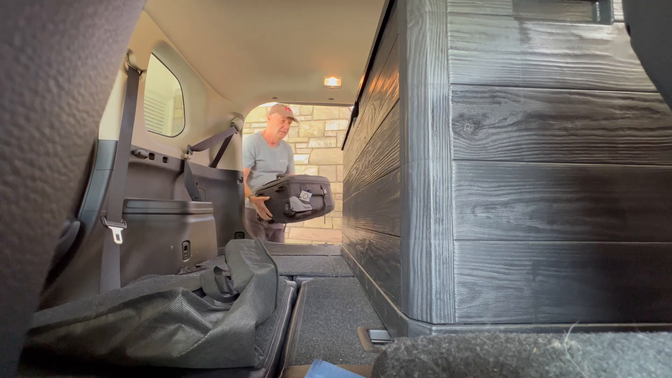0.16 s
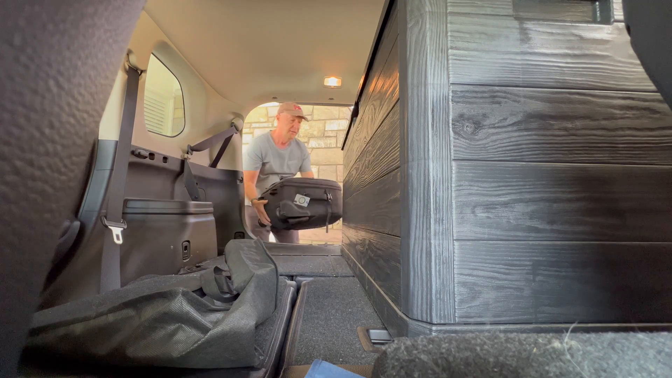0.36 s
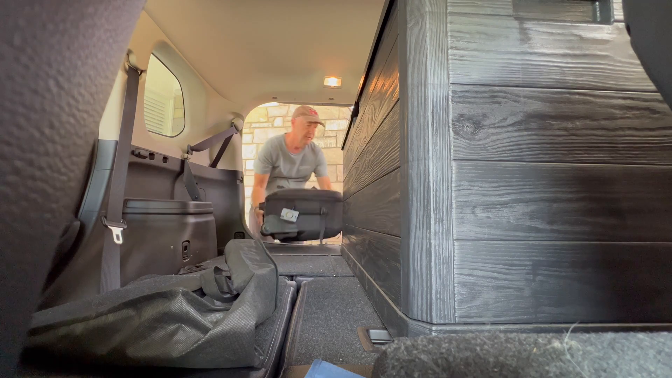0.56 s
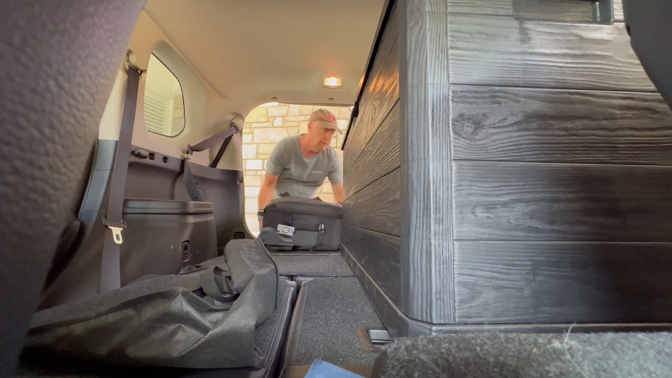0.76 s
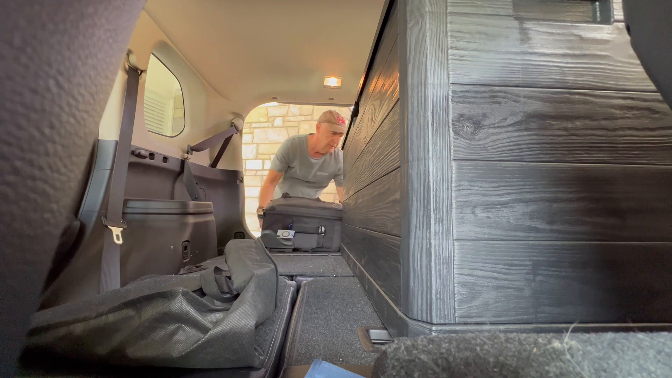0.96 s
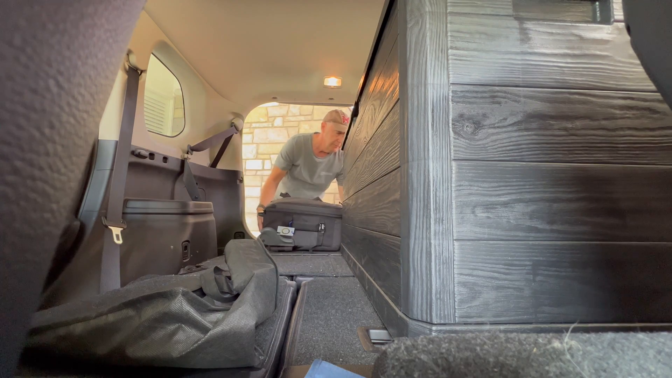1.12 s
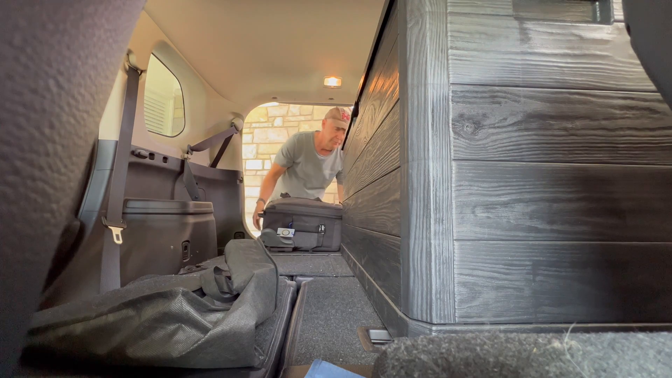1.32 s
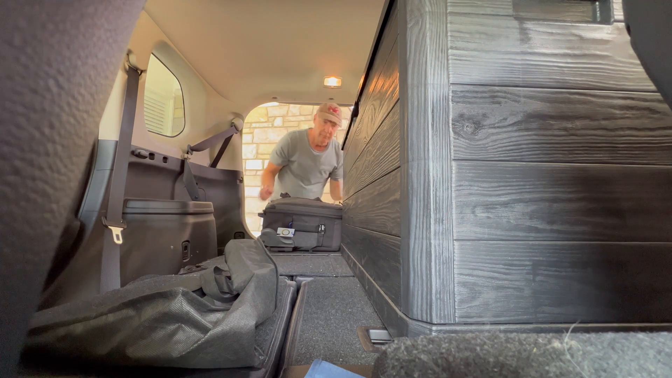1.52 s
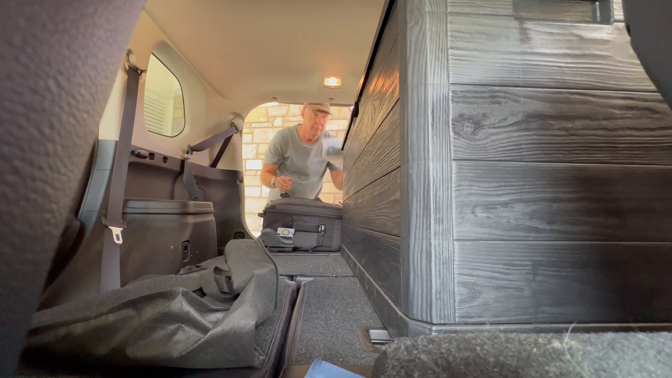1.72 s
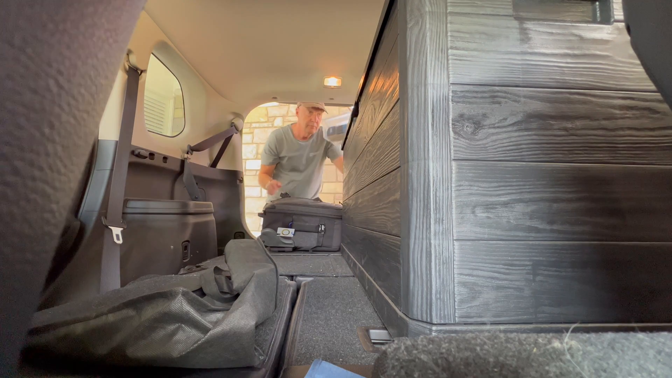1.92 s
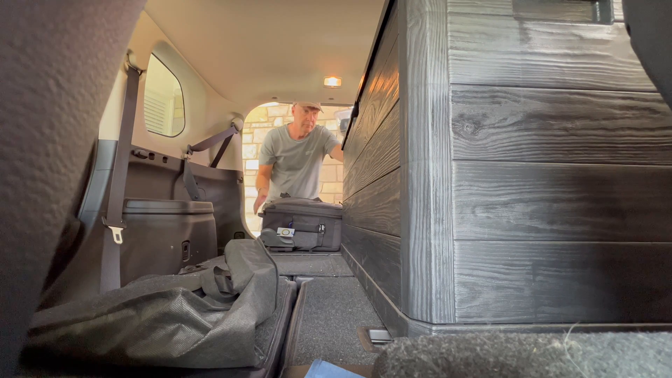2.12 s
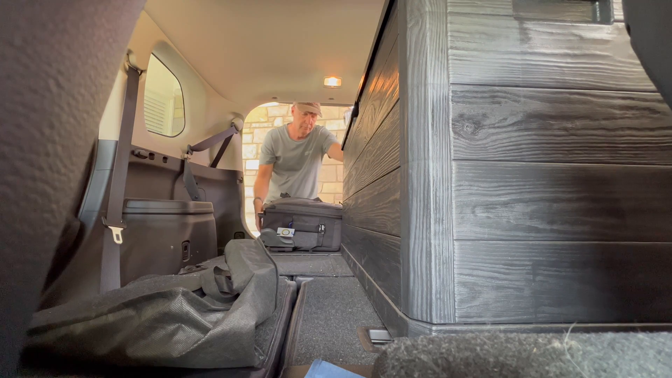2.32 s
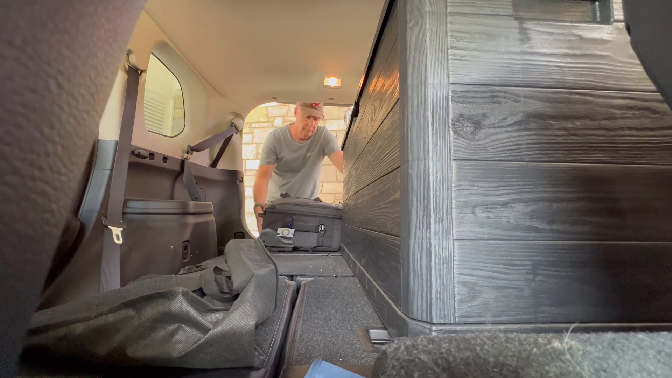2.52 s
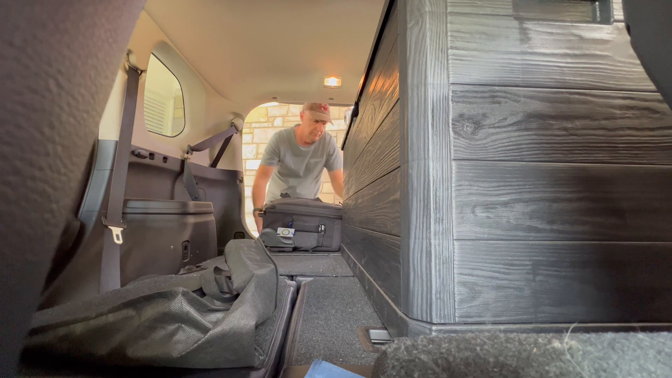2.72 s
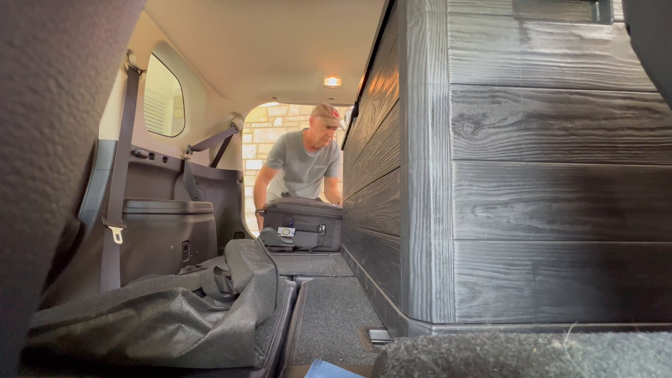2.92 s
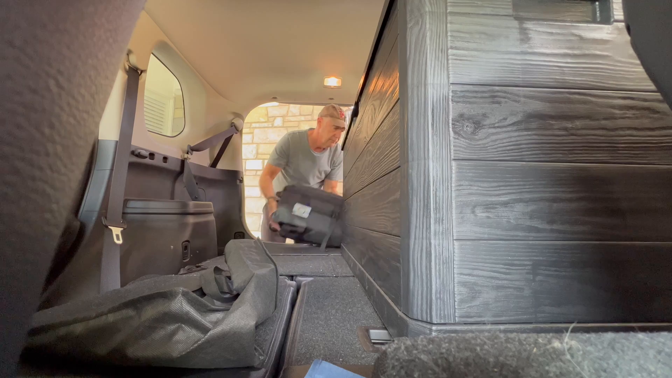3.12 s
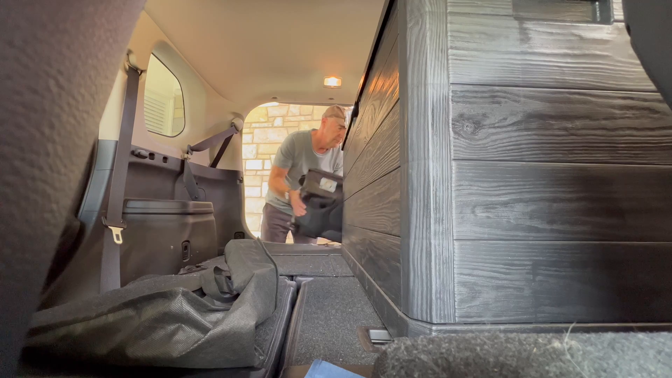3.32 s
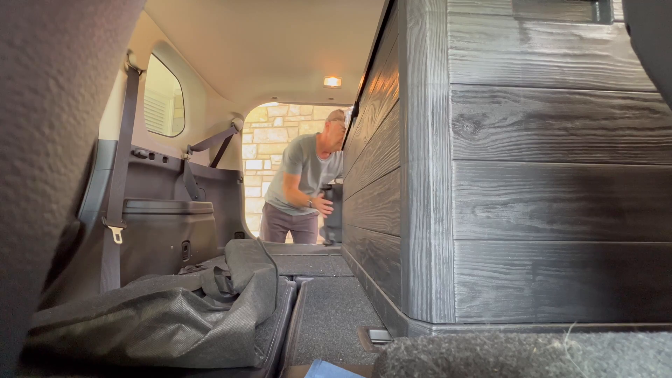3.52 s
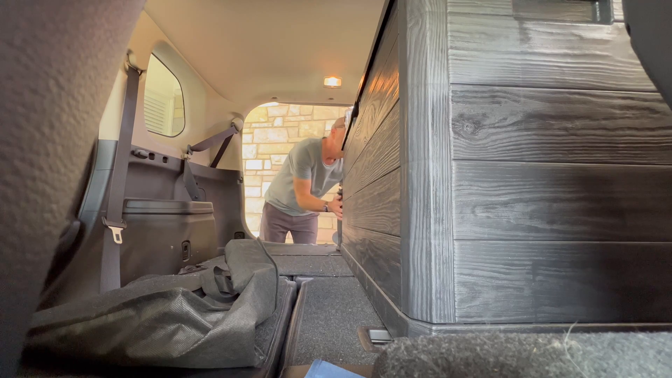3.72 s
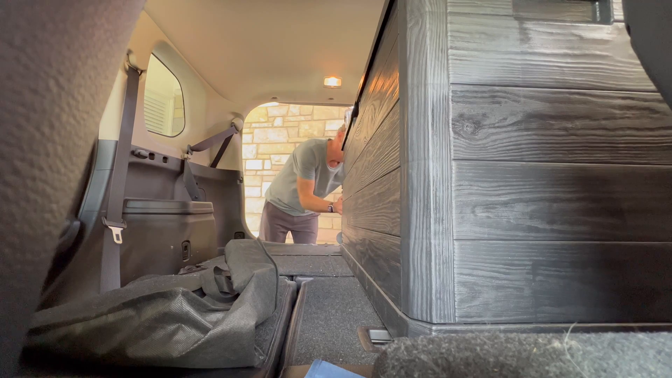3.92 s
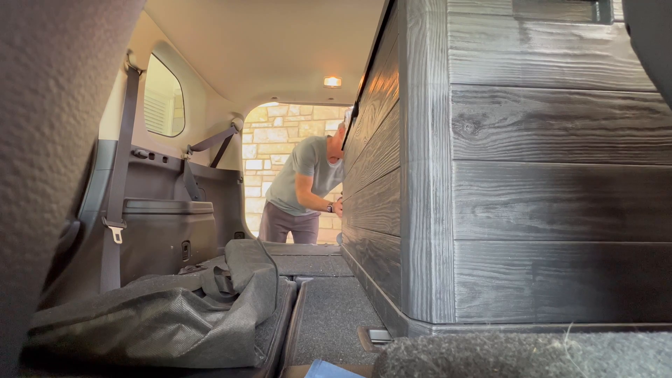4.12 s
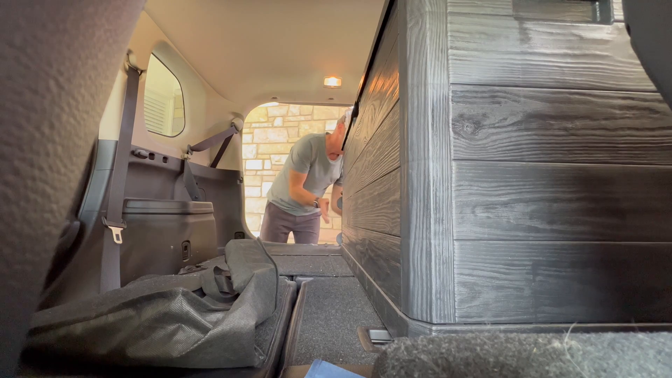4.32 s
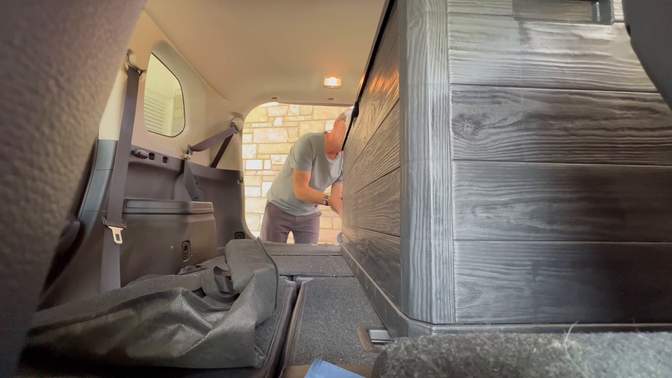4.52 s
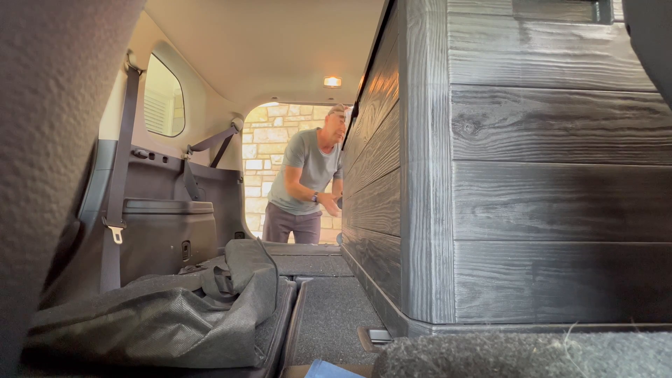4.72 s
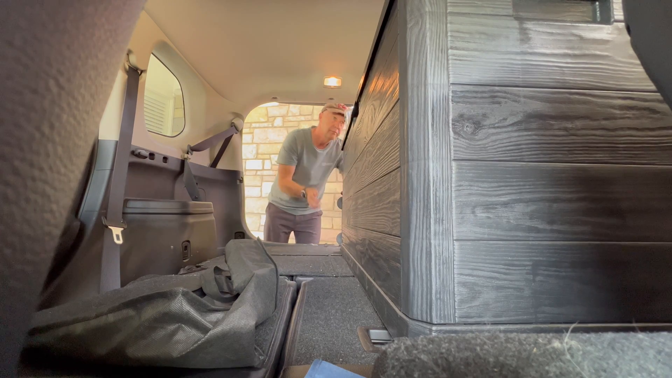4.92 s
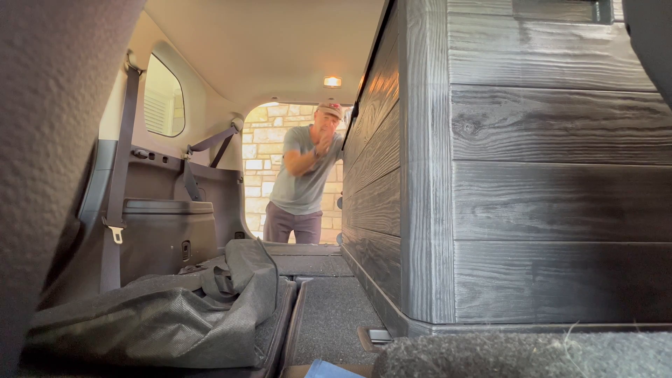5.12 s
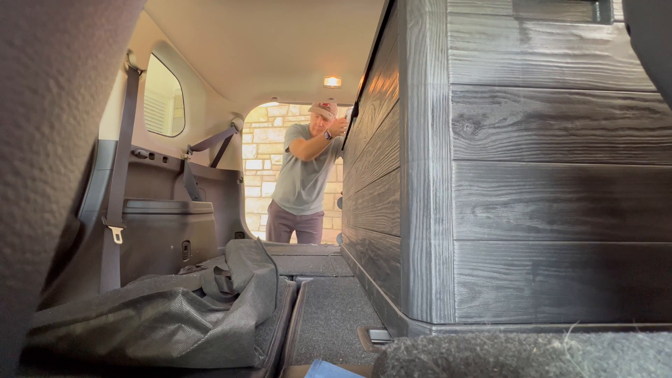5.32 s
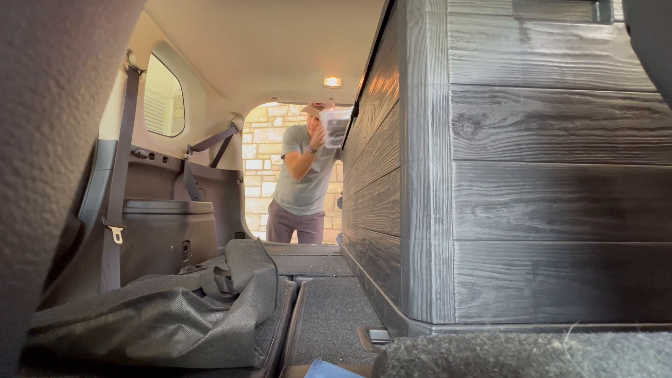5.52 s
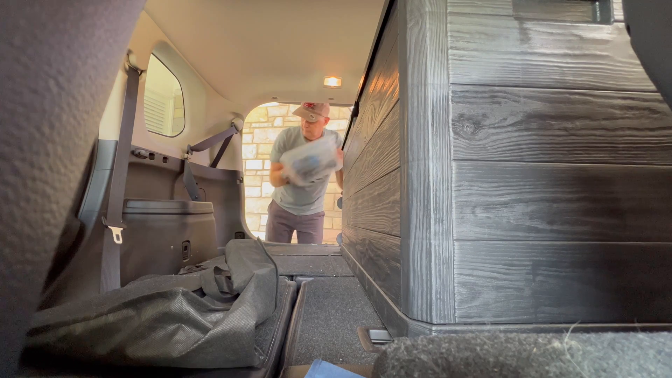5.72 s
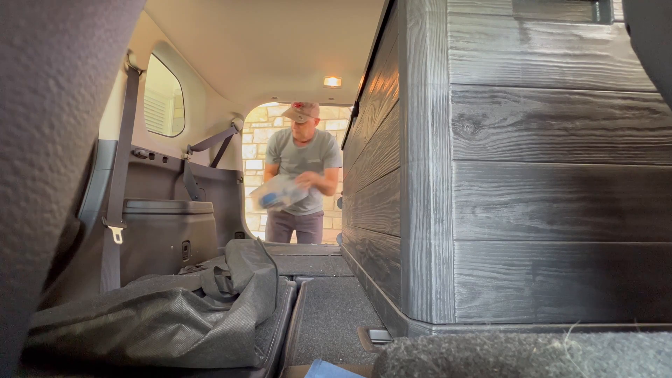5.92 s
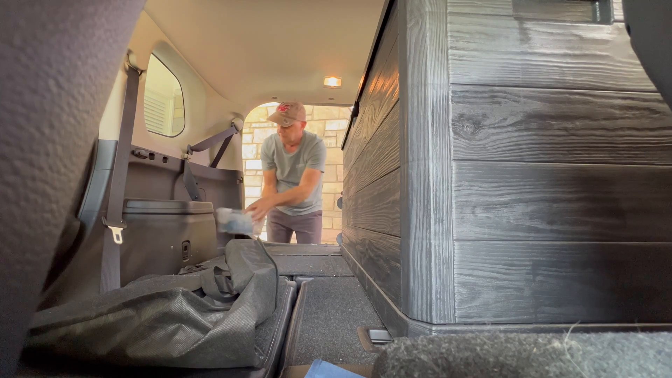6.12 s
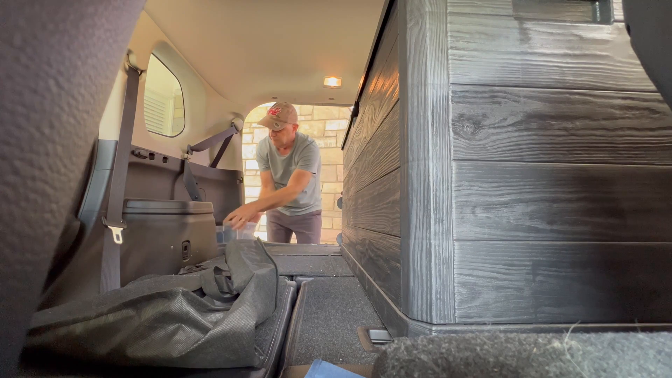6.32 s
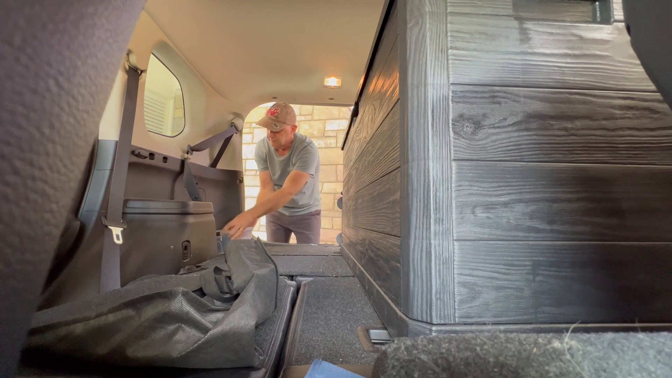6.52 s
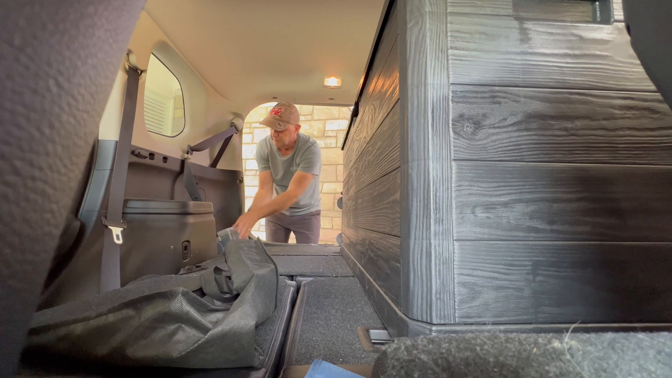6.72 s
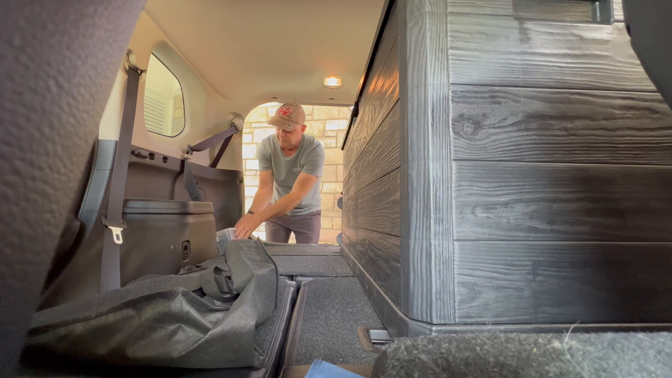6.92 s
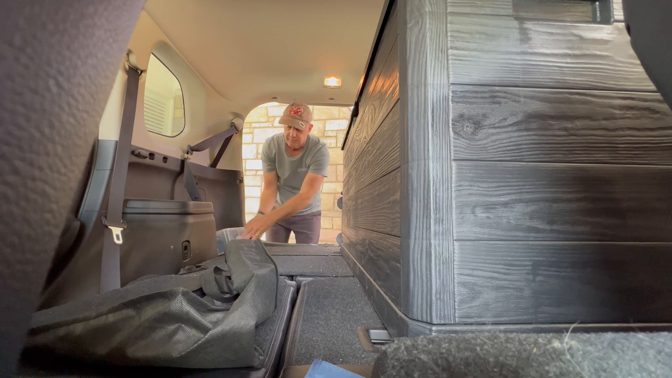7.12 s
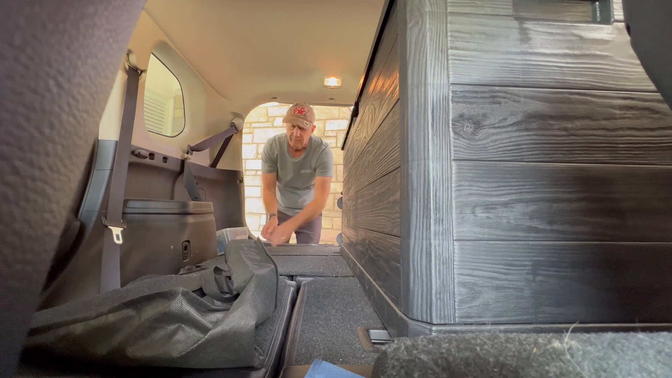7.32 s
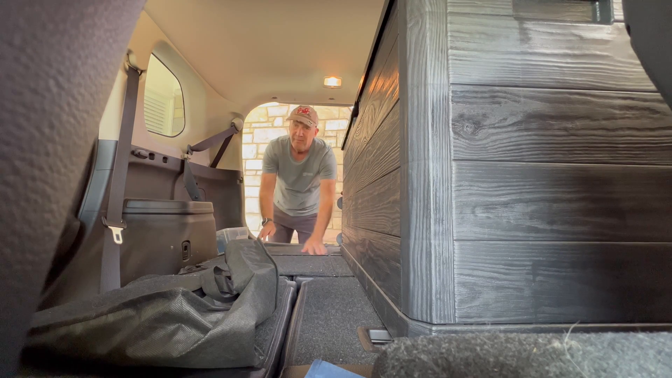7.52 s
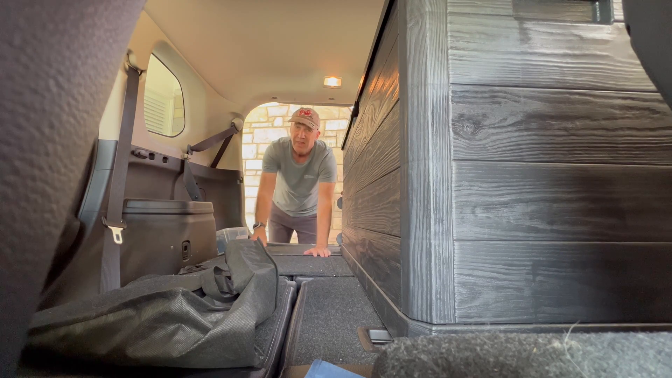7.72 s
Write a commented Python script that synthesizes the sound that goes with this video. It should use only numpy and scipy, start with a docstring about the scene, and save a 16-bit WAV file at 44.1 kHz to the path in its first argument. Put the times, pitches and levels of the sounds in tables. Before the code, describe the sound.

Gear is loaded at the tailgate of a car, with the microphone inside the cabin. Low floor thuds with dull plastic-shell knocks come in uneven groups, separated by short carpet scrapes, cloth swishes and an occasional small metal clink. The strongest activity is in the later part, with rapid rattling knocks and weighty booms, before it settles into quiet shuffling. The echo is short and muffled.

```python
"""In the carpeted cargo area of a car, heard from inside, cases and gear are set down and pushed about.
A hard edge knocks first: shaped noise and a few decaying shell modes. Then the weight thuds into the
load floor, a damped oscillation that sets the floor and cabin modes booming.
Between the blows fabric and shells slide and rustle as modulated noise bands, and small metal fittings
clink as clusters of short high partials. A padded echo and a faint steady hush surround it all."""
import sys
import numpy as np
from scipy import signal
from scipy.fft import rfft, irfft, next_fast_len
from scipy.io import wavfile
from scipy.ndimage import map_coordinates

SR = 44100
rng = np.random.default_rng(int(sys.argv[2]) if len(sys.argv) > 2 else 0)


def transcribe(u):
    """Save the signal u as a 16-bit wav file named by the first command-line argument.

    u: samples, shape (n,) or (channels, n), limited to [-1, 1]; the rate is SR.
    q: integer samples, one column per channel.
    """
    v = np.clip(np.atleast_2d(u).T, -1, 1)
    q = np.round(v * 32767).astype(np.int16)
    wavfile.write(sys.argv[1], SR, q)


N = 342083

# modes of a case's shell, before padding damps them: (frequency [Hz], level [dB], t60 [s])
SHELL_MODES = [(470, -5.5, 0.17), (539.5, 2, 0.12), (660, 1, 0.064), (754, 1.5, 0.096), (919, 4, 0.096),
               (992, -9, 0.086), (1327, -5, 0.22), (1574, -8, 0.11), (1770, -9.5, 0.053),
               (1965, -11.5, 0.19), (2400, -17, 0.068), (2455, -3, 0.04), (2800, -6, .1)]
# gear set down, edge first and weight after: (time [s], knock level [dB], brightness [dB],
# swell time [s], favoured shell pitch [Hz], thud level [dB], thud pitch [Hz], boom re thud [dB])
LANDINGS = [(.687, -17, -20.5, 0.003, 1500, -4, 99.4, -12), (1.002, -43.5, -22, .0015, 680, -30, 306, -3.5),
            (1.054, -31, -13, .0088, 750, -21, 150, -12), (1.072, -36.5, -22, .0035, 754, -17, 127.5, -10),
            (1.27, -40.5, -32, .0025, 750, -16, 95.7, -15.5),
            (1.439, -40.5, 6, 0.0021, 1510, -35.5, 383, -16.5),
            (1.62, -34, -23, 0.0033, 515, -40.5, 188, -21),
            (2.276, -26.5, -3.5, .0014, 1600, -11.5, 156, -23),
            (2.3126, -19, -6.5, 0.00054, 1370, -10, 97, -8.5),
            (2.322, -30.5, -20.5, 0.0022, 1360, -12, 214.6, -18),
            (3.181, -52, 9, 0.0062, 500, -23.5, 184.6, -18.5),
            (3.605, -20, -14.5, .0045, 650, -6.5, 94.6, -9), (3.749, -30, -23, 0.0018, 696, -15, 150, -17),
            (4.447, -31, -4, .011, 553, -19.5, 232.6, -7), (5.235, -24, -16, 0.0071, 1050, -8, 180.7, -25),
            (5.39, -34.5, -13.5, 0.0061, 1820, -24, 145, -13.5),
            (5.595, -31.5, -17.5, 0.0031, 1580, -29.5, 182, -14.5),
            (5.658, -21, -3.5, 0.0017, 2080, -6.5, 114, -10),
            (5.677, -19, -19.5, .0024, 2620, -9.5, 196.6, -12),
            (5.823, -31.5, -21, 0.0027, 1940, -24.5, 178, -11),
            (6.357, -22, -24, 0.00097, 685, -13.5, 136, -13),
            (6.533, -24, -16.5, 0.0035, 730, -15, 161, -13.5),
            (6.737, -32, -10, .0035, 1550, -26.5, 116, -13),
            (6.944, -14.5, -20.5, 0.0051, 636, -12, 138, -11)]


def amp(db):
    """Level to amplitude: 20 dB for each factor of ten."""
    return 10 ** (np.asarray(db) / 20)


def unit(x):
    """Normalisation to a root-mean-square of 1."""
    return x / np.sqrt(np.mean(x ** 2) + 1e-20)


def along(points, hz):
    """Linear interpolation of (frequency [Hz], value) points on a logarithmic frequency axis."""
    f, v = np.transpose(points)
    return np.interp(np.log(hz + 1), np.log(f + 1), v)


def fade(t, t60):
    """Exponential decay, losing 60 dB in t60 seconds."""
    return np.exp(-np.log(1000) * t / max(t60, 1e-3))


def rise(t, time_constant):
    """Exponential approach to 1, with a time constant in seconds."""
    return 1 - np.exp(-t / time_constant)


def wobble(rate):
    """Smooth random modulation: a spline through random knots, `rate` of them a second."""
    knots = rng.standard_normal(int(N * rate / SR) + 4)
    return map_coordinates(knots, [np.arange(N) * rate / SR])


def filtered(x, response):
    """Linear filtering: the spectrum of x times a response given as a function of frequency."""
    size = x.shape[-1]
    m = next_fast_len(size + 8192)
    return irfft(rfft(x, m) * response(np.fft.rfftfreq(m, 1 / SR)), m)[..., :size]


def add(track, s, sound):
    """Superposition: mix a sound into a track from time s."""
    part = track[..., max(round(s * SR), 0):][..., :sound.shape[-1]]
    part += sound[..., :part.shape[-1]]


def spread(pair, spectrum):
    """Interchannel coherence: colour two unrelated signals and mix them as mid and side."""
    # left-right correlation: (frequency [Hz], coherence [0 to 1])
    coherence = [(100, 0.93), (400, 0.91), (700, 0.93), (1200, 0.37), (2000, 0.34), (9000, 0.11),
                 (12000, .8)]

    def mid_side_response(hz):
        angle = np.arccos(np.clip(along(coherence, hz), -1, 1)) / 2
        return amp(along(spectrum, hz)) * [np.cos(angle), np.sin(angle)]

    mid, side = filtered(pair, mid_side_response)
    return np.array([mid + side, mid - side]) / np.std(mid)


def still_air():
    """Stationary noise: a faint, steady outdoor hush and microphone hiss."""
    # spectrum: (frequency [Hz], relative density [dB per Hz])
    hush_spectrum = [(15, -28), (25, 3.5), (59, -1), (160, -9.5), (523, -15), (1380, -22.5), (3500, -32),
                     (8810, -31), (11200, -32), (12500, -33.5), (15500, -53.5)]
    return amp(-60.5) * spread(rng.standard_normal((2, N)), hush_spectrum)


def cabin(x):
    """Reverberation: convolution with noise that decays by band, the padded echo of the interior."""
    # reverberation time: (frequency [Hz], t60 [s])
    reverberation = [(150, 0.63), (1000, 0.27), (4000, 0.36), (14000, 0.14)]
    hz, t, bands = signal.stft(rng.standard_normal((2, SR // 2)), SR, nperseg=256)
    decay = amp(-60 * t / along(reverberation, hz)[:, None])
    tail = signal.istft(bands * decay, SR, nperseg=256)[1]
    tail = tail * rise(np.arange(tail.shape[1]) / SR, 0.0013)
    return signal.fftconvolve(x, tail / np.linalg.norm(tail[0]), axes=1)[:, :N]


def motion():
    """Addition of powers: gains of rumble, scrape and swish from every shove and settling load."""
    # one push, pull or drag: (start [s], length [s], rumble level [dB], scrape level [dB],
    # fabric swish level [dB], slowing [dB per s])
    shoves = [(0.085, 0.24, -53.5, -49, -58, 52), (0.457, 0.1, -58.5, -67.5, -76, 0),
              (0.588, .06, -46, -58, -67, 0), (.67, .02, -38, -47, -53, -11),
              (0.711, 0.25, -45, -42, -46.5, 57), (1.039, 0.031, -29.5, -41, -53.5, -2.5),
              (1.135, 0.13, -39.5, -56.5, -64.5, 19), (1.47, 0.044, -46.5, -47.5, -49, 94),
              (1.638, 0.37, -47, -52, -73, 38.5), (2.399, .12, -36.5, -45.5, -55, 55),
              (2.633, 0.051, -67.5, -71, -64.5, 0), (2.774, 0.13, -47.5, -49.5, -52.5, 15),
              (2.94, 0.076, -52, -44.5, -51.5, -10), (3.074, 0.14, -47, -42.5, -47, 10),
              (3.324, 0.12, -53.5, -45, -49, 5), (3.469, 0.14, -43.5, -44.5, -42.5, -23.5),
              (3.765, 0.17, -37, -44, -47, 6), (4.017, 0.11, -46, -51.5, -56, -7.5),
              (4.27, 0.032, -46.5, -65, -72, 93), (4.469, 0.19, -35.5, -41.5, -46, 65.5),
              (4.785, 0.094, -58, -86, -92, -1), (5.073, 0.13, -70, -72, -73, 31),
              (5.326, 0.029, -39, -42.5, -54, 7), (5.842, .27, -44, -45.5, -53, 21),
              (6.158, 0.074, -50, -56.5, -76, 30), (6.556, 0.22, -28.5, -42.5, -59.5, 2.5),
              (6.804, 0.19, -32, -52, -58, 22), (7.119, 0.35, -58, -74, -80.5, 12),
              (7.38, 0.25, -51.5, -67.5, -75, -13), (7.584, 0.18, -45.5, -54.5, -59.5, 52)]
    # rumble, scrape and swish of a landed load as it settles: (level re its thud setting [dB])
    settle_levels = [-26.5, -42, -52]
    attack, release, settle = 331, 168.5, 78.5  # dB per s
    t, power = np.arange(N) / SR, np.zeros((3, N))
    for s, length, rumble_db, scrape_db, swish_db, slowing in shoves:
        attack_db = -attack * np.maximum(s - t, 0)
        slowing_db = -slowing * np.clip(t - s, 0, length)
        release_db = -release * np.maximum(t - s - length, 0)
        levels = amp([[rumble_db], [scrape_db], [swish_db]])
        power += (levels * amp(attack_db + slowing_db + release_db)) ** 2
    settling = amp(settle_levels)[:, None] * amp(-settle * t[:SR])
    for s, *_, thud_db, _, _ in LANDINGS:
        add(power, s, (amp(thud_db) * settling) ** 2)
    return np.sqrt(power)


def friction(spectrum, catches, catch_db):
    """Stick-slip: rubbing noise swells in short scratches at random catches, so many a second."""
    t = np.arange(SR // 16) / SR
    snags = (rng.random(N) < catches / SR) * rng.uniform(0.1, 1, N)
    scratches = signal.fftconvolve(snags, fade(t, .03))[:N]
    rubbing = rng.standard_normal((2, N)) * (1 + amp(catch_db) * scratches)
    return spread(rubbing, spectrum)


def sliding():
    """Friction excites resonance: dragged gear shakes the floor, scrapes its shell and brushes fabric."""
    # spectra of the three: (frequency [Hz], relative density [dB per Hz])
    rumble_spectrum = [(20, -29), (35, -3), (47, 4.5), (75, 0.5), (120, -5), (190, -3.5), (300, -13),
                       (420, -15), (900, -61)]
    scrape_spectrum = [(200, -2), (400, 4.5), (700, -1.5), (1050, 1.5), (1900, 0), (2800, -11.5),
                       (4500, -43.5)]
    swish_spectrum = [(1500, -9.5), (3000, 4), (5000, 3), (7000, -1), (9500, 1), (11000, -6), (13000, -6),
                      (16000, -21)]

    def shell_response(f):
        peaks = sum(amp(db) / (1 + ((f - hz) * t60 / 2) ** 2) for hz, db, t60 in SHELL_MODES)
        return 1 + amp(-2.5) * peaks

    shaking, scraping, brushing = motion()
    rumble = shaking * amp(1.5) * friction(rumble_spectrum, catches=26, catch_db=7.5)
    carpet_noise = friction(scrape_spectrum, catches=45, catch_db=3.5)
    scrape = scraping * amp(2.08) * unit(filtered(carpet_noise, shell_response))
    swish = brushing * friction(swish_spectrum, catches=61, catch_db=-2)
    jerks = amp(0.9 * wobble(35))  # rubbing goes in little jerks
    return rumble + jerks * (scrape + swish)


def clinks():
    """Modal synthesis: small metal fittings ring briefly, with new mode strengths on every touch."""
    # buckles and zip pulls: (time [s], level [dB], t60 [s], level of the low ping [dB])
    touches = [(1.228, -47, .1, -10), (1.41, -42, 0.072, -5), (1.438, -25.5, 0.068, -25),
               (1.448, -33, 0.1, -30), (1.472, -43.5, 0.14, -22), (2.794, -27, 0.07, -1),
               (4.122, -42.5, 0.091, -14), (4.178, -44.5, .1, -8), (4.263, -47, 0.11, -14),
               (4.354, -51.5, 0.069, -18), (4.44, -35, .05, -25)]
    # metal modes: (nominal frequency [Hz], mean level [dB])
    metal_modes = [(6680, -17), (8250, -17), (9550, -14), (11330, -6.5), (12310, -15), (14600, -31)]
    ping_hz, detune = 4750, .004  # lowest mode of a buckle; random pitch spread as a share
    chatter_spectrum = [(2500, -13.5), (7000, -3.0), (14000, -7.5)]  # (Hz, dB per Hz)
    out, t = np.zeros((2, N)), np.arange(SR // 3) / SR
    for s, db, t60, ping_db in touches:
        ring = 0
        for hz, level in [*metal_modes, (ping_hz, ping_db)]:
            strength = amp(level + rng.normal(0, 0.89, (2, 1)))
            cycles = hz * rng.normal(1, detune) * t + rng.random((2, 1))
            ring = ring + strength * np.sin(2 * np.pi * cycles)
        chatter = amp(-8.0) * spread(rng.standard_normal((2, len(t))), chatter_spectrum)
        add(out, s, amp(db - 3.0) * (ring + chatter) * fade(t, t60) * rise(t, .0015))
    return out


def edges():
    """Contact stiffness sets brightness: (time, hollow, clack and tick dB, swell s, shell Hz) per contact."""
    # knocks without a thud of their own, faint to strong, some within a heavier blow:
    # (time [s], knock level [dB], brightness [dB], swell time [s], favoured shell pitch [Hz])
    lone_knocks = [(1.526, -38, -21, 0.0022, 540), (1.879, -39, -60, .0012, 580),
                   (2.107, -52.5, -34, 0.0024, 560), (4.284, -48, -29, 0.0018, 535),
                   (4.427, -51, -21, 0.0011, 1500), (2.961, -44, -4, .001, 1700),
                   (3.006, -38.5, -14.5, 0.002, 1720), (5.207, -40, -8.5, 0.0037, 510),
                   (5.224, -39, -18, 0.0036, 900), (5.424, -43, -24, 0.00038, 1900),
                   (5.699, -23, -18, 0.0032, 1270), (5.848, -34, -18, .0035, 1860),
                   (5.956, -19, -16, 0.00093, 1080), (6.083, -28.5, -12, 0.0014, 814),
                   (6.501, -41, -46, .0014, 547), (6.935, -26.5, -21, 0.006, 650),
                   (6.95, -20, -22.5, 0.0019, 900), (7.357, -42, -18.5, 0.0058, 1520),
                   (7.461, -41.5, -44, 0.00082, 544), (7.744, -36, -31, 0.0013, 546)]
    # stiff, high-pitched spots clack more: (shell pitch [Hz], added clack level [dB])
    stiffness = [(800, -1), (1300, 5.5)]
    clack_share = 0.45  # the tick gains all of the brightness, the clack this share
    contacts = []
    for s, db, bright_db, swell, hz, *_ in LANDINGS + lone_knocks:
        clack_db = db + clack_share * bright_db + along(stiffness, hz)
        contacts.append((s, db, clack_db, db + bright_db, swell, hz))
    return contacts


def knocks():
    """Impact and modal decay: force swells as padding gives, then dies as noise while shell modes ring."""
    # contact spectra: (frequency [Hz], relative density [dB per Hz])
    hollow_spectrum = [(90, -15.5), (220, -1.5), (400, 1), (750, -1), (1100, -5), (1700, -24.5),
                       (4000, -58)]
    clack_spectrum = [(500, -46), (1100, -3), (1400, 2), (2200, -2.5), (3000, -8.5), (4200, -13.5),
                      (7000, -36)]
    tick_spectrum = [(2000, -23), (4200, 7.5), (6500, 2.5), (9500, 1), (12000, -10.5), (16000, -21)]
    padding_t60 = .25  # s; hands and carpet damp the shell modes further
    lead = .05  # s of swell ahead of the contact
    t = np.arange(SR // 2) / SR
    after = np.maximum(t - lead, 0)
    force, ring = np.zeros((3, N)), np.zeros(N)
    for s, hollow_db, clack_db, tick_db, swell, centre_hz in edges():
        press = np.exp(np.minimum(t - lead, 0) / max(swell, 1e-4))
        # a crack and a longer clatter
        burst = press * (0.38 * fade(after, 0.042) + 0.67 * fade(after, 0.1))
        add(force, s - lead, amp([[hollow_db], [clack_db], [tick_db]]) * burst)
        modes = 0
        for hz, level, life in SHELL_MODES:
            # the spot that is struck favours the modes near one pitch
            off_centre_db = 20 * abs(np.log2(hz / centre_hz))
            strength = amp(level + rng.normal(0, 2.5) - off_centre_db)
            tone = np.sin(2 * np.pi * hz * rng.normal(1, 0.011) * t)
            modes = modes + strength * tone * fade(t, life)
        ring_db = along([(800, hollow_db), (1300, clack_db)], centre_hz)
        add(ring, s, amp(ring_db) * modes * fade(t, padding_t60) * rise(t, 0.0018))
    spectra = (hollow_spectrum, clack_spectrum, tick_spectrum)
    hollow, clack, tick = [spread(rng.standard_normal((2, N)), colour) for colour in spectra]
    crowded = force[0] * hollow + amp(-1.5) * force[1] * clack + amp(-0.5) * force[2] * tick
    rattle = amp(1.8 * wobble(160))  # loose parts chatter
    return amp(1) * ring + rattle * crowded


def loads():
    """Momentum follows contact: (time s, level dB, pitch Hz, boom dB) of every thud in the floor."""
    # low thuds without a knock of their own: soft bumps, and the added body and after-swing
    # of landings: (time [s], level [dB], pitch [Hz])
    soft_thuds = [(.735, -10, 52.3), (.812, -27.5, 48), (1.081, -25, 334), (1.321, -27.5, 122.4),
                  (3.465, -32, 347), (3.614, -18.5, 380), (3.627, -12, 100), (3.703, -14.5, 55.8),
                  (3.75, -23, 363), (3.85, -23.5, 52.5), (4.455, -25, 380), (4.468, -22.5, 60.3),
                  (4.638, -25.5, 72.3), (5.273, -22.5, 73.3), (5.364, -32, 244), (5.712, -13, 114),
                  (6.12, -27.5, 186), (6.549, -12, 84.3), (6.578, -14, 147.3), (6.668, -24, 210),
                  (6.982, -6.5, 57), (7.083, -25, 50), (7.586, -29, 109)]
    # the weight lags a sharp edge, and comes sooner by so many swell times after a soft one
    weight_lag, swell_leads = 0.00895, 1.2  # s, swell times
    soft_boom_db = -21.5
    arrivals = []
    for s, _, _, swell, _, db, hz, boom_db in LANDINGS:
        arrivals.append((s + weight_lag - swell_leads * swell, db, hz, boom_db))
    return arrivals + [(s, db, hz, soft_boom_db) for s, db, hz in soft_thuds]


def thuds():
    """Damped oscillation: each thud swings on the padded floor and sets floor and cabin modes ringing."""
    # modes of load floor and cabin air: (nominal frequency [Hz], mean level [dB], t60 [s])
    floor_modes = [(43.07, -4, 0.76), (57.64, -16.5, 0.15), (77.6, 3, 0.27), (111.1, -2.5, 0.42),
                   (152.6, 3, 0.19), (195.9, 2, 0.23), (245.4, -4.5, 0.2), (291.8, -7, 0.23),
                   (345.5, -13.5, 0.28)]
    bounce_t60 = 0.081  # s
    out, t = np.zeros(N), np.arange(SR * 3 // 4) / SR
    for s, db, hz, boom_db in loads():
        bounce = np.sin(2 * np.pi * hz * t) * fade(t, bounce_t60) * rise(t, 0.002)
        flex = np.sin(2 * np.pi * hz * rng.normal(1.73, 0.071) * t)  # inharmonic overtone
        flex = amp(-7.5) * flex * fade(t, 0.84 * bounce_t60) * rise(t, 0.0055)
        boom = 0
        for f, level, life in floor_modes:
            strength = amp(level + rng.normal(0, 2.6))
            tone = np.sin(2 * np.pi * f * rng.normal(1, .025) * t)
            boom = boom + strength * tone * fade(t, life)
        boom = amp(boom_db - 5.0) * boom * rise(t, 0.005)
        add(out, s, amp(db + 4) * (bounce + flex + boom))
    return out


def scene():
    """Interaural cues: the gear is at the tailgate, a little left, placed by level and phase differences."""
    # left minus right: (frequency [Hz], level difference [dB])
    tilt = [(60, -1), (300, -0.4), (1000, 1.5), (2000, 2.5), (3500, 5), (6500, 6), (9000, -6.5),
            (12000, 0.5)]
    # left ahead of right: (frequency [Hz], phase lead [rad])
    phase_lead = [(120, 0.31), (500, 0.62), (720, 1.16), (1050, 3.2), (1500, 4.66), (2300, 7.05),
                  (7400, 7.3), (8500, 10), (10400, 9.9), (12400, 6.83)]
    contacts = knocks() + clinks()
    mix = contacts + amp(-11.5) * cabin(contacts) + thuds() + sliding() + still_air()

    def placement(hz):
        gain = amp(np.array([[.5], [-.5]]) * along(tilt, hz))
        return gain * np.exp(1j * np.array([[0], [-1]]) * along(phase_lead, hz))

    return filtered(mix, placement)


def record(dry):
    """Band limiting: the microphone sheds deep bass, its ports cut two dips, and the top is cut off."""
    # dips of the microphone ports: (centre [Hz], width [Hz], level [dB])
    port_dips = [(5370, 290, -6.5), (7620, 380, -12)]
    low_cut = [(10, -25.5), (25, -11.5), (42, -1)]  # (Hz, dB)
    top_hz = 15950

    def microphone(hz):
        dips = sum(db * np.exp(-(2 * (hz - centre) / width) ** 4) for centre, width, db in port_dips)
        return amp(dips) * amp(along(low_cut, hz)) * (hz < top_hz)

    return filtered(dry, microphone)


dry = scene()
out = record(dry)
transcribe(out)
```